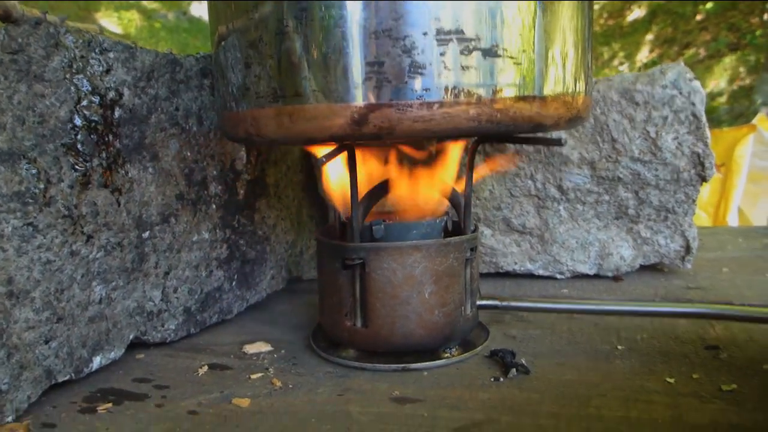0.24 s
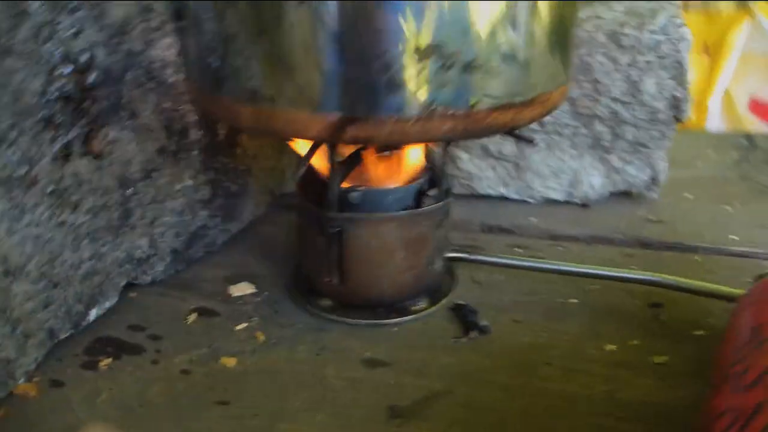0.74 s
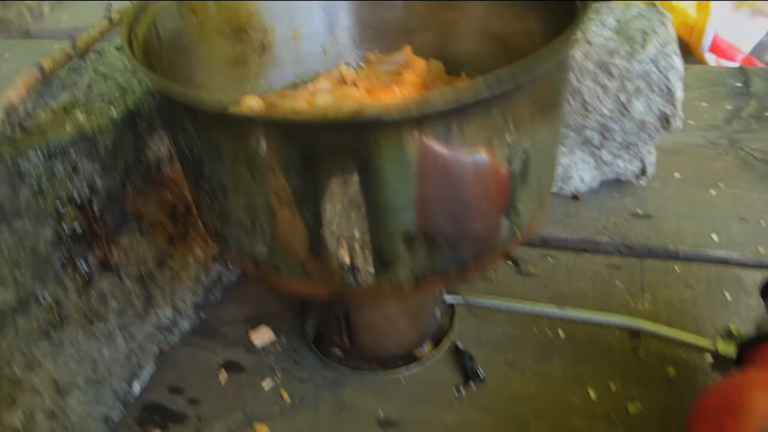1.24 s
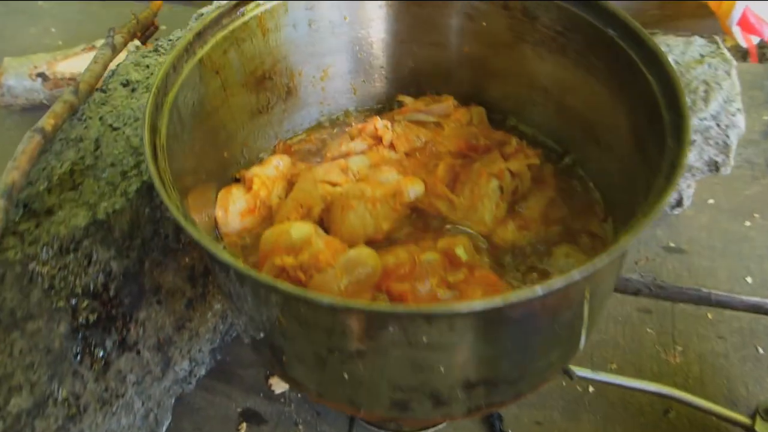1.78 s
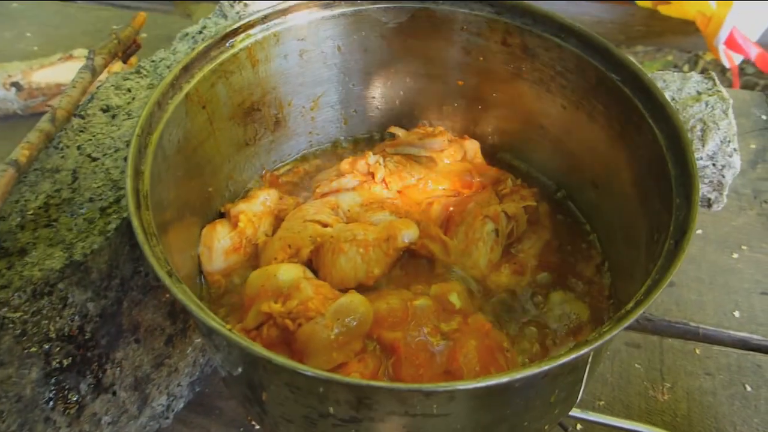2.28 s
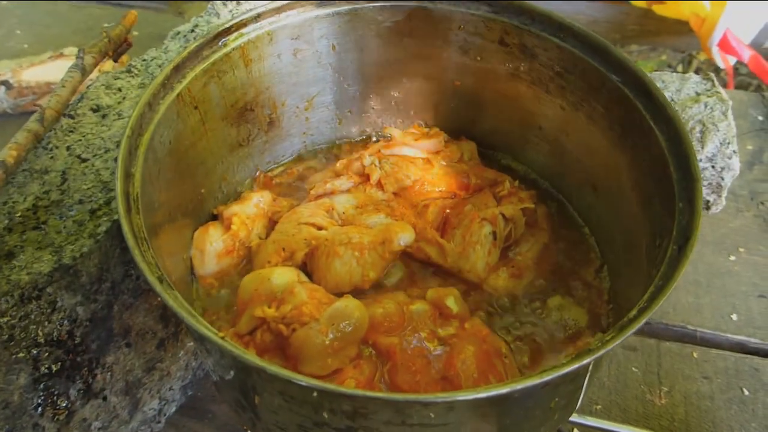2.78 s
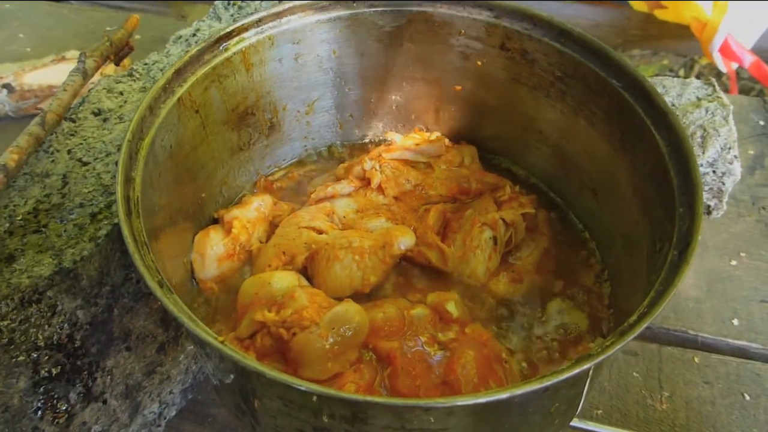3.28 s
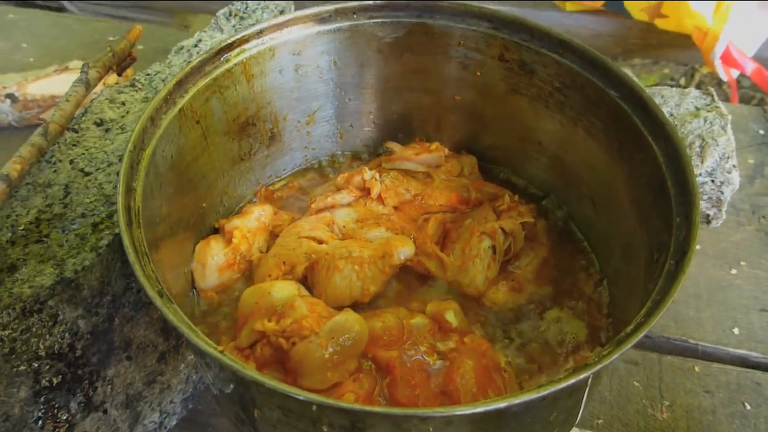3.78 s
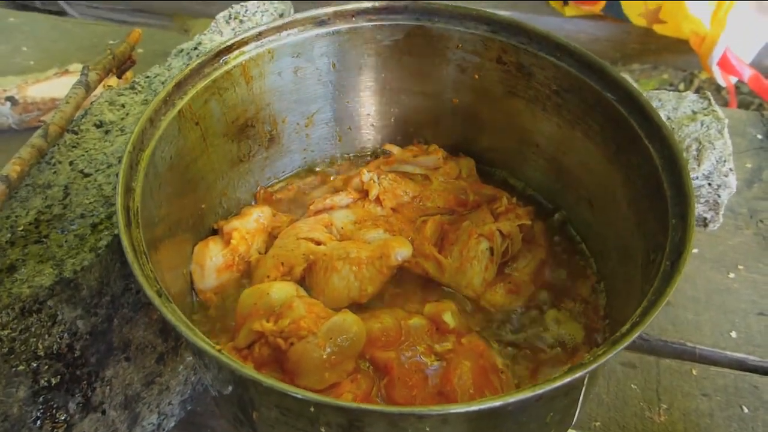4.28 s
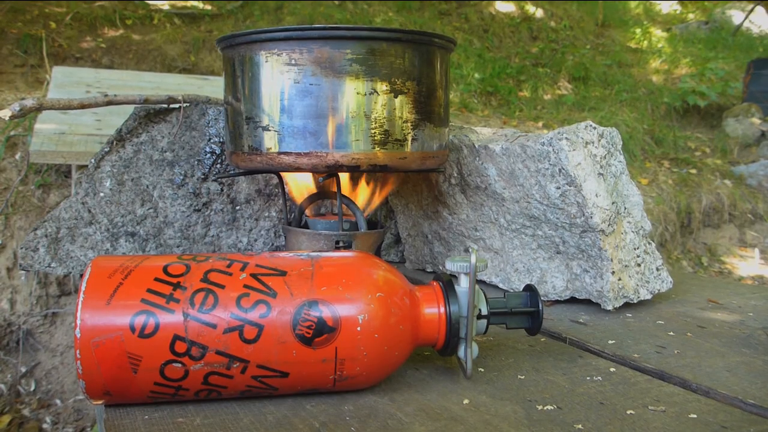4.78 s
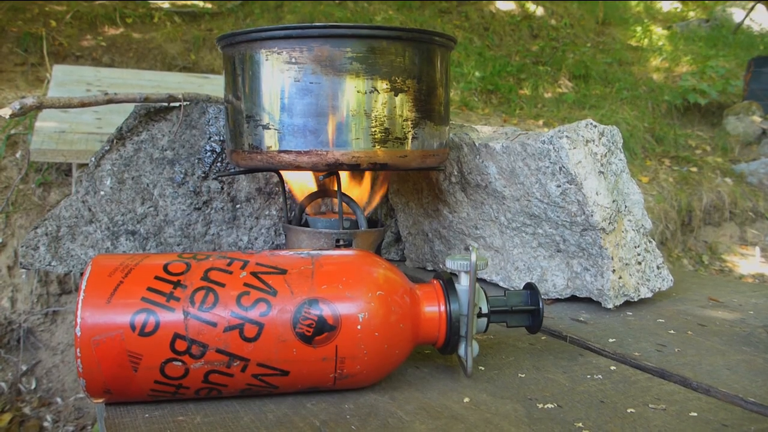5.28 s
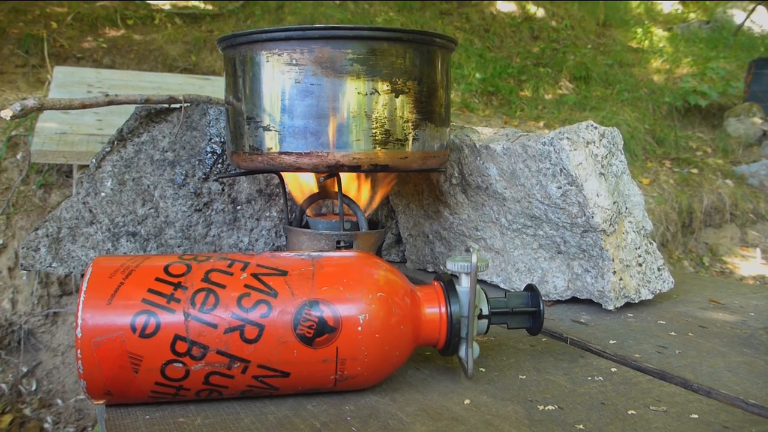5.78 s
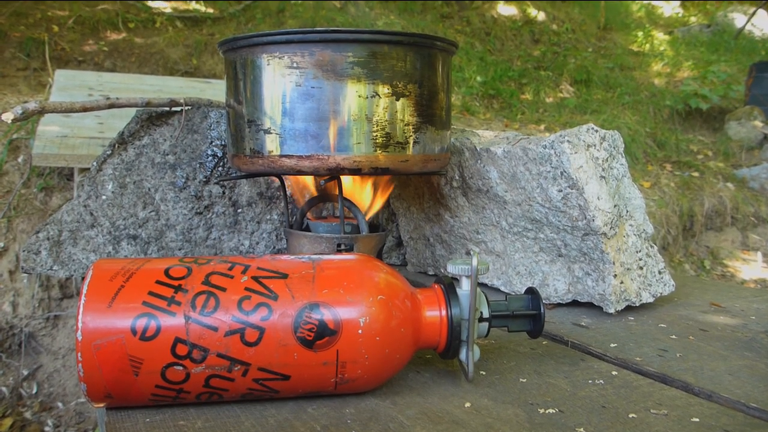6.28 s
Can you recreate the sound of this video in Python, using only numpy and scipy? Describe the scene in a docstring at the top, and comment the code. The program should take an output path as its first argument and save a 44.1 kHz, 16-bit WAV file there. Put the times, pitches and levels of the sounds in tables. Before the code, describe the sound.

A pressurised camp stove roars and flutters outdoors while a pot of fat crackles and spits, cutting to brief silence before roaring again louder.

```python
"""A pressurised stove roars outdoors under a pot of frying food between stones: fluttering shaped noise.
From the start the grip rumbles (low noise) and the pot crackles (noise bursts). A hand-held camera rises
from the flame to the pot: fat spits (decaying modes), bubbles blip (rising tones), the roar surges briefly
(low tones), a finger scrapes the casing (band noise), and the casing clicks once (modes and noise), ducking
the gain. The sound cuts out, then returns from a new place beside the stove."""
import sys
import numpy as np
from scipy import signal
from scipy.io import wavfile
from scipy.ndimage import uniform_filter1d, minimum_filter1d

SR = 44100
rng = np.random.default_rng(int(sys.argv[2]) if len(sys.argv) > 2 else 0)


def digitize_waveform(pressure):
    """Quantize a signal to 16-bit integers and store it at the path in sys.argv[1].

    Rows of a 2-D input are taken as channels; values are limited to [-1, 1].
    """
    field = np.atleast_2d(pressure).T
    bounded = np.clip(field, -1, 1)
    quanta = np.round(bounded * 32767).astype(np.int16)
    wavfile.write(sys.argv[1], SR, quanta)


N = 288411
HOP, FRAME = 256, 1024  # STFT, samples

# pause: (start [s], end [s])
SILENCE = (4.3755, 4.6175)
# camera low beside the flame, level with the pot wall, over the rim, above the food, facing the stove: time [s]
PLACES = [.72, 1.1, 1.8, 3.3, 4.6]
# resonances of the microphone and camera body: (frequency [Hz], relative level [dB], t60 [s])
BODY = [(3400, 0, .012), (4400, -3, .01), (4900, 1, .011), (5700, -8, .01), (6500, -8, .008),
        (7400, -6, .009), (8400, -1, .008), (9700, 0, .009), (10400, -1, .009), (11000, -2, .008),
        (12200, -2, .007), (13200, -4, .006), (14300, -6, .005)]


def gain_of(db):
    """Amplitude ratio of a level in dB."""
    return 10 ** (np.asarray(db) / 20)


def evened(x):
    """Scale to rms 1."""
    return x / np.sqrt(np.mean(x ** 2) + 1e-20)


def bandpass(order, lo_hz, hi_hz, x):
    """Butterworth band-pass."""
    sos = signal.butter(order, [lo_hz, hi_hz], "band", fs=SR, output="sos")
    return signal.sosfilt(sos, x)


def read(points, hz):
    """Interpolate a (frequency, value) table along log frequency."""
    f, value = np.transpose(points)
    return np.interp(np.log(hz + 1), np.log(f + 1), value)


def add(mix, s, sound):
    """Add a stereo sound at a time in s, cut at the end of the mix."""
    part = mix[:, round(s * SR):][:, :sound.shape[1]]
    part += sound[:, :part.shape[1]]


def wander(lo_hz, hi_hz):
    """Smooth random curve of rms 1 between two rates."""
    return evened(bandpass(1, lo_hz, hi_hz, rng.standard_normal(N)))


def by_place(tables, hz, t):
    """Value per frequency and time, blended along the camera's path; the last place starts after the pause."""
    # three tables: beside the flame, over the rim, facing the stove
    when = PLACES if len(tables) == len(PLACES) else PLACES[::2]
    t = np.where(t < np.mean(SILENCE), np.minimum(t, when[-2]), when[-1])
    share = np.array([np.interp(t, when, one) for one in np.eye(len(when))])
    return np.array([read(table, hz) for table in tables]).T @ share


def at_places(values, t):
    """One value per place, blended along the camera's path; the last place starts after the pause."""
    return np.where(t < np.mean(SILENCE), np.interp(t, PLACES[:-1], values[:-1]), values[-1])


def ports(hz, t):
    """Complex gain of the left and right microphone port: level and phase split evenly between them."""
    # per place: (frequency [Hz], left minus right [dB])
    lean = [
        [(100, 1.5), (1000, 0), (1400, -5.5), (2200, -7), (2600, 0.5), (4000, -1), (5700, 6.5), (6800, -7.5),
         (8500, 4.5), (10300, 1.5), (12000, -3.5)],
        [(100, 1), (900, -0.5), (1200, 1.5), (1600, -1), (1950, -3.5), (2250, -.5), (2800, -2.5), (3700, 0),
         (4300, -1), (5600, 7.5), (7500, -9.5), (8500, -2.5), (9800, 5), (11800, -8), (13500, -2)],
        [(100, 0), (800, 3), (1200, 1.5), (1600, -1.5), (2200, -3), (3600, -1), (4200, -5), (4700, 1),
         (5700, 6), (7500, -8.5), (8500, 1.5), (10300, 3), (12000, -5)],
    ]
    # per place: (frequency [Hz], left lead [rad])
    lead = [
        [(100, 0), (2300, 0), (2600, 0.89), (3400, 0), (5170, .6), (6200, -1.1), (6800, -.3), (8500, .7),
         (10600, -1), (12000, 0.35)],
        [(100, 0), (1200, .15), (1400, -.3), (1900, -.2), (2800, .4), (3300, .5), (4200, .1), (5200, .7),
         (6200, -1.1), (8300, .8), (9600, -.1), (11000, -1.3), (11900, .1)],
        [(100, 0), (600, -.1), (1000, -.35), (1300, -1), (1600, -.5), (2500, -.1), (3700, -.2), (4300, .3),
         (5250, .7), (6100, -1.3), (8300, .3), (10800, -.9), (12200, .25)],
    ]
    left = gain_of(by_place(lean, hz, t) / 2) * np.exp(.5j * by_place(lead, hz, t))
    return np.array([left, 1 / left])


def through_ports(pair):
    """A pair of signals as the two ports hear it."""
    hz, t, z = signal.stft(pair, SR, nperseg=FRAME, noverlap=FRAME - HOP)
    return signal.istft(z * ports(hz, t), SR, nperseg=FRAME, noverlap=FRAME - HOP)[1][:, :N]


def flame_layer(shape, level_db, flutter, patchy_db):
    """Turbulent noise under the flame's flutter, coloured by the place and heard through two ports."""
    # likeness of the two ports: (frequency [Hz], likeness [0..1])
    likeness = [(60, 0.36), (150, 0.99), (300, 1), (850, 1), (1200, 0.84), (1450, 0.97), (1950, 0.91),
                (3600, 0.91), (4200, 0.65), (4700, 0.96), (6000, 0.69), (7600, .3), (8400, 0.98),
                (9000, .3), (10000, 0.74), (11300, 0.19), (13000, 0.594)]
    # dip from the pot wall's reflection slides as the camera rises: (time [s], centre [Hz], gain [dB])
    sweep = [(.8, 1800, 0), (.96, 1900, -7), (1.2, 2060, -3), (1.4, 1900, 0)]
    sweep_width_hz = 110
    noise = rng.standard_normal((2, N)) * flutter
    hz, t, (a, b) = signal.stft(noise, SR, nperseg=FRAME, noverlap=FRAME - HOP)
    patches = uniform_filter1d(rng.standard_normal(a.shape), 10, 0)
    patches = evened(uniform_filter1d(patches, 12, 1))

    inside = (hz >= shape[0][0][0]) & (hz <= shape[0][-1][0])
    colour = gain_of(by_place(shape, hz, t)) * inside[:, None]
    colour /= np.sqrt(np.mean(colour ** 2, 0))
    when, dip_hz, dip_db = np.transpose(sweep)
    off = (hz[:, None] - np.interp(t, when, dip_hz)) / sweep_width_hz
    colour *= gain_of(np.interp(t, when, dip_db) * np.exp(-.5 * off ** 2))

    same = np.clip(read(likeness, hz), 0, 1)[:, None]
    common = np.sqrt((1 + same) / 2) * a
    apart = np.sqrt((1 - same) / 2) * b
    z = np.array([common + apart, common - apart]) * ports(hz, t)
    z *= colour * gain_of(patchy_db * patches)
    out = signal.istft(z, SR, nperseg=FRAME, noverlap=FRAME - HOP)[1][:, :N]
    return gain_of(level_db) * out / np.sqrt(np.mean(out.mean(0) ** 2))


def flame():
    """Roar, hiss and fizz share the unsteady burning and a quick sputter, which is strongest in the finer layers."""
    # roar through stove cup, pot and stones, per place: (frequency [Hz], relative density [dB per Hz])
    roar_shape = [
        [(18, -82), (30, -53.5), (238, -8), (287, -9), (379, -3.5), (528, 1), (590, 1.5), (697, -2.5),
         (887, -1), (1280, -22), (1570, -10.5), (2160, -12), (2500, -30.5), (3250, -55.5), (5500, -120)],
        [(18, -73), (30, -48.5), (86, -46), (213, -20), (292, -19.5), (339, -20.5), (624, -7.5), (1090, -23),
         (1310, -38), (1430, -27.5), (1830, -32), (2040, -40.5), (2500, -31.5), (3250, -62), (5500, -120)],
        [(18, -73), (30, -49), (70, -45.5), (156, -22.5), (326, -10.5), (365, -22.5), (393, -11.5), (648, -2.5),
         (1310, -28.5), (1570, -17), (1860, -29.5), (2120, -20.5), (2500, -43), (3250, -71.5), (5500, -120)],
        [(18, -80), (30, -53), (59, -58), (177, -18.5), (247, -11.5), (372, -15), (473, -4.5), (636, 1.5),
         (1240, -29), (1570, -12), (1890, -24.5), (2120, -17.5), (2500, -40), (3250, -69), (5500, -120)],
        [(35, -78), (60, -49.5), (268, -12), (350, -15.5), (429, -13), (604, 1), (839, -11.5), (996, -6),
         (1090, -11), (1200, -29), (1490, -9.5), (1570, -3), (1860, -26.5), (2140, -15), (2500, -33.5),
         (3250, -29), (5500, -120)],
    ]
    # jet hiss, three places: (frequency [Hz], relative density [dB per Hz])
    hiss_shape = [
        [(1410, -12.5), (2400, -16.5), (2720, 1), (2900, 0.5), (3620, -2), (4310, -2), (5740, -11.5),
         (6980, -13), (7500, -18.5), (9750, -47.5), (16500, -120)],
        [(1410, -34.5), (2400, -10), (2780, 4.5), (3180, 3.5), (4000, -8), (4750, -3), (5990, -20), (6530, -10),
         (7500, -36.5), (9750, -62), (16500, -120)],
        [(1410, -27.5), (2400, -13.5), (2690, 4.5), (3100, -26), (3370, -1.5), (3700, -1), (4550, -10),
         (5220, -8.5), (5990, -18.5), (7050, -17), (7500, -32.5), (9750, -57.5), (16500, -120)],
    ]
    # fine fizz, three places: (frequency [Hz], relative density [dB per Hz])
    fizz_shape = [
        [(4350, -39), (7100, -5), (7750, -11), (8390, -2.5), (9000, -8.5), (9600, 3.5), (10500, 4), (11500, -6),
         (13300, -8.5), (15400, -28)],
        [(4350, -30), (7400, -2), (7770, -12.5), (8340, 3), (8980, -17.5), (9540, 4), (10100, 6), (11200, -5),
         (13500, -15.5), (15400, -30.5)],
        [(4350, -18), (7400, 2), (7800, -11), (8600, -4), (9000, -10), (10100, 3.5), (10700, 1), (11300, -27.5),
         (11800, 0), (12300, -5), (14400, -27.5), (15400, -51)],
    ]
    # roar as flame and camera move: (time [s], level [dB])
    roar_level = [(0, -20.5), (.4, -19), (.85, -18.5), (1.05, -21.5), (1.27, -19.5), (1.6, -21.5),
                  (1.8, -19.5), (2.0, -22.5), (2.6, -21.5), (3.3, -18), (4.0, -17.5), (4.4, -19.5),
                  (4.6, -18), (4.9, -15), (5.2, -17), (5.5, -15.5), (6.54, -16)]
    # hiss relative to the roar, one per place: level [dB]
    hiss_under_db = [-24.5, -21.5, -23, -25, -19]
    # fizz: (time [s], level [dB])
    fizz_level = [(0, -62), (.5, -57), (1.27, -55), (1.48, -55), (1.6, -63), (2.0, -64), (2.4, -57),
                  (4.0, -54.5), (4.4, -56), (4.6, -61), (4.9, -56), (5.5, -53), (5.8, -48), (6.54, -49.5)]
    t = np.arange(N) / SR
    roar_db = np.interp(t, *np.transpose(roar_level))
    hiss_db = roar_db + at_places(hiss_under_db, t)
    fizz_db = np.interp(t, *np.transpose(fizz_level))
    burning, sputter = wander(16.0, 120.), wander(8., 600.)
    roar = flame_layer(roar_shape, roar_db, gain_of(1.14 * burning + .7 * sputter), patchy_db=1.29)
    hiss = flame_layer(hiss_shape, hiss_db, gain_of(.87 * burning + 1.6 * sputter), patchy_db=1.4)
    fizz = flame_layer(fizz_shape, fizz_db, gain_of(.7 * burning + 1.4 * sputter), patchy_db=3.0)
    return roar + hiss + fizz


def handling():
    """Hands and breeze: low band noise, partly unlike at the two ports, swelling where the grip shifts."""
    # grip shifts: (time [s], rise [dB], half length [s])
    jolts = [(.87, 16, 0.1), (3.65, 7, .15), (5.85, 10, .1)]
    rumble_db, resting_dip_db = -74.5, -4.5
    t = np.arange(N) / SR
    a, b = rng.standard_normal((2, N))
    rumble = evened(bandpass(3, 18., 75., [a + .5 * b, a - .5 * b]))
    # steadier camera from the rim until the pause
    resting = np.interp(t, [PLACES[1], PLACES[2], SILENCE[0], N / SR], [0, 1, 1, 0])
    jolts_db = sum(db * np.maximum(1 - abs(t - s) / half_s, 0) for s, db, half_s in jolts)
    return rumble * gain_of(rumble_db + resting_dip_db * resting + jolts_db)


def burst(lo_hz, hi_hz, t60_s, noise):
    """A short band of noise dying fast; its energy is that of a 1 ms tone of peak 1."""
    t = np.arange(noise.shape[1]) / SR
    envelope = np.minimum(t / .001, 1) * gain_of(-60 * t / t60_s)
    out = bandpass(4, lo_hz, hi_hz, noise * envelope)
    return out * np.sqrt(SR / 1000 / np.sum(out ** 2))


def crackle():
    """Small random pops from the pot: short noise bursts, each kind in eight different colours."""
    out = np.zeros((2, N))
    near = np.interp(np.arange(N) / SR, [PLACES[0], PLACES[2], *SILENCE], [.38, .69, 1.0, .19])
    # dull pops, sharper pops, bright ticks: (lowest [Hz], highest [Hz], least level when near [dB], rate [1/s])
    kinds = [(2400., 3800., -41., 170.), (2700., 4900., -45., 110.), (8000., 11500., -57., 120.)]
    for lo_hz, hi_hz, db, rate in kinds:
        extra_db = 4. * np.minimum(rng.exponential(1, N), 3.4)
        size = gain_of(db + extra_db) * (rng.random(N) < rate / SR) * near
        colour = rng.integers(0, 8, N)
        for k in range(8):
            noise = .4 * rng.standard_normal((2, 500)) + rng.standard_normal(500)
            grain = burst(lo_hz, hi_hz, .011, noise)
            out += signal.oaconvolve((size * (colour == k))[None], grain, axes=1)[:, :N]
    return out


def spit(centre_hz, pop_db, chance):
    """A drop of fat spits: a click coloured by the body resonances, bright ones round a centre plus a lower pop."""
    rise_s, log_width, pop_top_hz, scatter_db = .0012, .2, 7000, 2.
    t = np.arange(800) / SR
    hz, db, t60_s = np.transpose(BODY)[:, :, None]
    turn, scatter, detune = chance.T[:, :, None]
    tones = np.sin(2 * np.pi * hz * (1 + .015 * detune) * t + 3 * turn)
    modes = gain_of(db + scatter_db * scatter - 60 * t / t60_s) * tones
    pair = modes * np.minimum(t / rise_s, 1) ** 2 * np.ones((2, 1, 1))
    bright = (pair * np.exp(-.5 * (np.log(hz / centre_hz) / log_width) ** 2)).sum(1)
    pop = (pair * (hz < pop_top_hz)).sum(1)
    # each part has the energy of a 1 ms tone, before pop_db
    both = bright / np.linalg.norm(bright) + gain_of(pop_db) * pop / np.linalg.norm(pop)
    return np.sqrt(SR / 1000) * both


def frying():
    """Fat spits as short clicks; bursting liquid bubbles give short blips of rising pitch."""
    # spits: (time [s], bright part re 1 ms tone of peak 1 [dB], centre [Hz], low pop re bright part [dB])
    spits = [(.7792, -33, 8200, 9), (.7955, -37, 8800, 2), (1.009, -39, 10500, -10), (1.092, -40, 8400, -8),
             (1.282, -35, 8000, 2), (1.408, -28, 9950, -12), (1.4234, -38, 9970, -8),
             (1.504, -38, 9200, -6), (1.9403, -33, 9000, 10), (2.147, -35, 8600, -8),
             (2.2023, -39, 10300, -8), (2.319, -35, 10200, -6), (2.3318, -21, 10200, -15),
             (2.4737, -38, 9980, 2), (2.8584, -20, 9800, -19), (3.533, -38, 10000, -6),
             (3.5668, -32, 9900, -10), (3.5858, -27, 8600, 8), (3.606, -34, 9400, -6),
             (3.676, -37, 9720, -8), (3.7383, -35, 8600, 0), (3.7712, -35, 9600, -8),
             (3.855, -36, 8350, -2), (3.8655, -30, 10500, -14), (3.9179, -39, 8470, -6),
             (3.9394, -37, 10000, -6), (3.9734, -44, 8000, 13), (4.0248, -44, 8000, 13),
             (4.043, -44, 8000, 12), (4.2681, -37, 8800, 3)]
    # bubbles: (time [s], level before rise and decay [dB], starting pitch [Hz])
    blips = [(0.7792, -7.5, 2580), (1.1254, -24, 2900), (1.255, -18, 2800), (1.2795, -24, 5100),
             (1.3514, -17, 2700), (1.356, -19, 5100), (1.483, -15.5, 2680), (1.814, -19, 3070),
             (1.941, -15, 2700), (2.4168, -18, 2720), (2.4743, -19, 2740), (2.5995, -23, 2770),
             (2.9087, -23, 3030), (3.019, -29, 3500), (3.208, -25, 2900), (3.302, -14, 2750),
             (3.436, -21, 3000), (3.518, -12, 2680), (3.5873, -17.5, 2770), (3.6062, -28, 2800),
             (3.9734, -21, 2840), (4.0248, -23, 2760), (4.1235, -16, 2800), (4.336, -17, 2730)]
    out, t = np.zeros((2, N)), np.arange(1500) / SR
    chances = rng.standard_normal((len(spits), len(BODY), 3))
    for (s, db, hz, pop_db), chance in zip(spits, chances):
        add(out, s, gain_of(db) * spit(hz, pop_db, chance))
    for s, db, hz in blips:
        envelope = np.minimum(t / .0012, 1) * gain_of(db - 60 * t / .009)
        blip = np.sin(2 * np.pi * hz * t * (1 + 10 * t)) * envelope
        add(out, s, np.array([blip, blip]))
    return out


def roar_surges():
    """Short low surges of the roar: decaying tones."""
    # surges: (time [s], level before rise and decay [dB], frequency [Hz])
    surges = [(.7795, -4, 860), (.9200, 1, 596), (4.1700, 1, 690)]
    t60_s = .018
    out, t = np.zeros((2, N)), np.arange(1500) / SR
    for s, db, hz in surges:
        tone = np.sin(2 * np.pi * hz * t) * np.minimum(t / .0015, 1) * gain_of(db - 60 * t / t60_s)
        add(out, s, np.array([tone, tone]))
    return out


def rustle():
    """A finger slides on the casing: a short grainy scrape of band noise."""
    # (centre [s], level at centre [dB], half length [s], lowest [Hz], highest [Hz])
    s, db, half_s, lo_hz, hi_hz = (1, -38, 0.07, 3300, 5300)
    t = np.arange(N) / SR
    grains = gain_of(3.7 * wander(30., 400.))
    noise = evened(bandpass(4, lo_hz, hi_hz, rng.standard_normal((2, N)) * grains))
    return gain_of(db) * noise * np.maximum(1 - abs(t - s) / half_s, 0)


def casing_click():
    """The camera's plastic casing snaps and rings: decaying modes, unlike at each port, and a crack of noise."""
    # modes: (frequency [Hz], relative level [dB], t60 [s], left minus right [dB], left lead [rad])
    casing = [(620, -17, .015, -10, 1.5), (1120, -9, .07, 0, 2.8), (1320, -9, .02, -3, 2.8),
              (2670, -4, .022, 0, -.9), (3430, -9, .02, -15, .4), (4390, -9, .02, 10, 1.0),
              (5060, -8, .018, 1, .9), (5950, -22, .012, 16, 0), (6400, -18, .011, 0, -1.4),
              (8050, -24, .008, -9, -.2), (9300, -27, .008, 3, .5), (10600, -27, .008, -9, 0),
              (11950, -22, .008, -11, -.6), (13300, -22, .008, -7, 1.2), (15000, -27, .006, -3, 0)]
    click_s, click_db, crack_db = 1.2943, -2.5, -8  # crack before click_db
    out, t = np.zeros((2, N)), np.arange(3000) / SR
    hz, db, t60_s, lean_db, lead = np.transpose(casing)[:, :, None]
    sign = (-1.) ** np.arange(len(casing))
    ring = []
    for side in (.5, -.5):  # left, right
        decay = gain_of(db + side * lean_db - 60 * t / t60_s)
        ring.append(sign @ (decay * np.sin(2 * np.pi * hz * t + side * lead)))
    ring = np.array(ring) * np.minimum(t / .001, 1)
    noise = rng.standard_normal((2, 3000)) + .5 * rng.standard_normal(3000)
    crack = gain_of(crack_db) * burst(2200, 5800, .018, noise)
    add(out, click_s, gain_of(click_db) * (ring + crack))
    return out


def scene():
    """Sum of all layers."""
    cooking = through_ports(frying() + crackle())
    return flame() + handling() + cooking + roar_surges() + rustle() + casing_click()


def record(dry):
    """Narrow notch; gain control ducks on treble peaks, holds and recovers; clipping; the pause; the band limit."""
    # narrow band missing from the sound: (centre [Hz], width [Hz])
    notch_hz, notch_width_hz = (9000, 200)
    threshold_db, cut_per_db = -12, 1.2
    release_share, recover_s = .72, .11  # share of the cut left after the hold; its time constant
    edge_hz = 16500
    t = np.arange(N) / SR
    dry = signal.lfilter(*signal.iirnotch(notch_hz, notch_hz / notch_width_hz, SR), dry)

    treble = signal.sosfilt(signal.butter(4, 2200, "high", fs=SR, output="sos"), dry)
    treble_db = 20 * np.log10(abs(treble).max(0) + 1e-9)
    over_db = np.maximum(treble_db - threshold_db, 0)
    held_db = -minimum_filter1d(-over_db, size=2425, origin=1212)  # holds 55 ms
    fall = t / recover_s
    tail_db = np.exp(np.maximum.accumulate(np.log(held_db + 1e-9) + fall) - fall)
    duck_db = cut_per_db * np.maximum(held_db, release_share * tail_db)
    duck_db = uniform_filter1d(duck_db, size=201, origin=100)  # takes 4.5 ms to fall

    on = (t < SILENCE[0]) | (t > SILENCE[1])
    out = np.clip(dry / gain_of(duck_db), -1, 1) * on
    lowpass = signal.firwin(511, edge_hz, window=("kaiser", 9), fs=SR)
    return signal.oaconvolve(out, lowpass[None], "same")


dry = scene()
out = record(dry)
digitize_waveform(out)
```